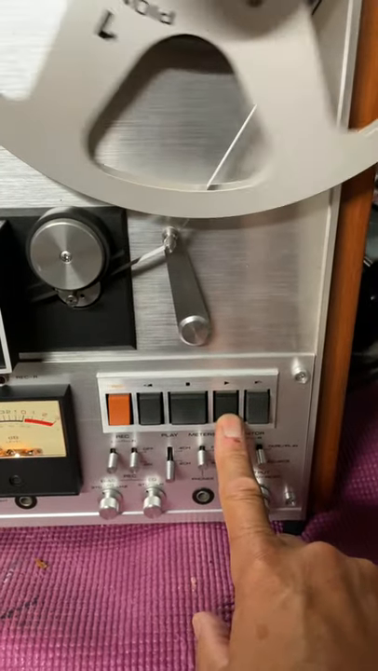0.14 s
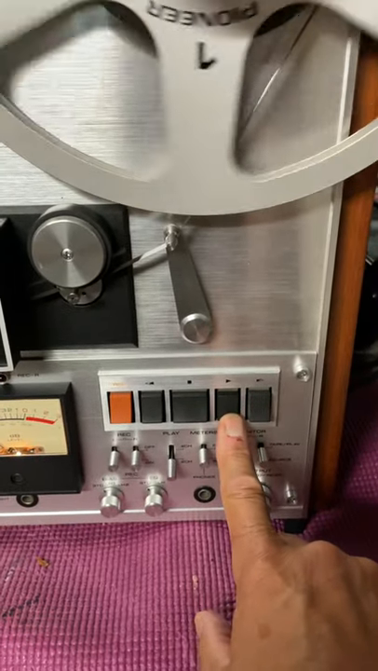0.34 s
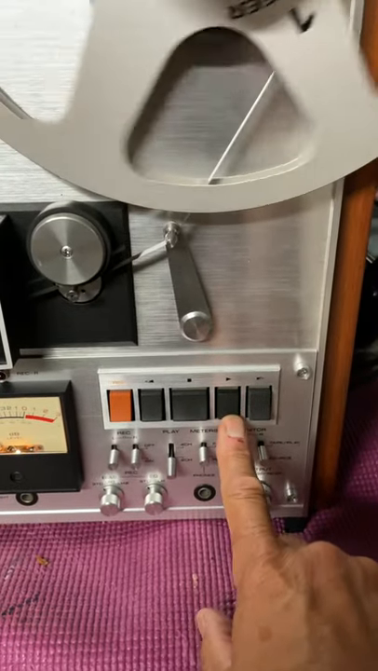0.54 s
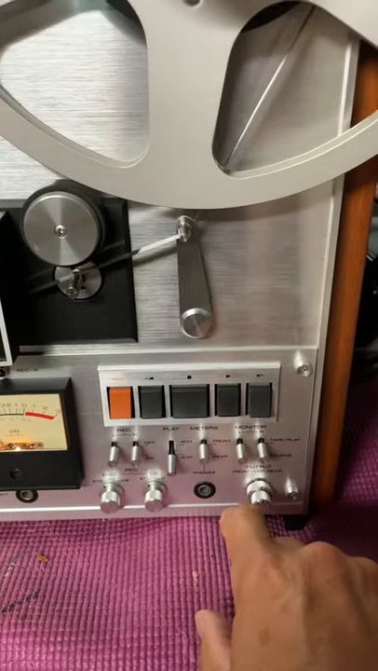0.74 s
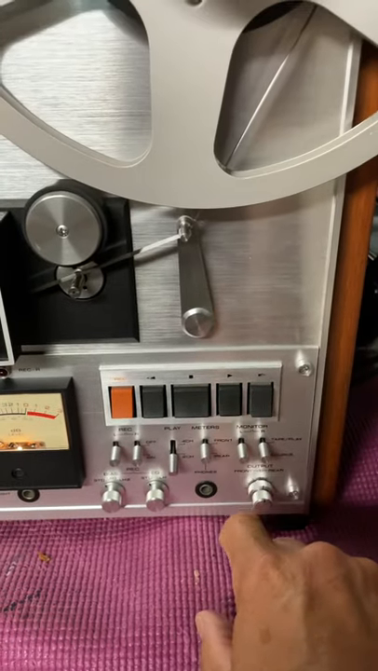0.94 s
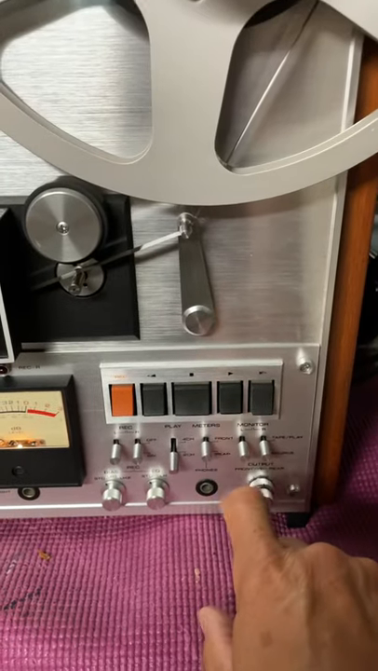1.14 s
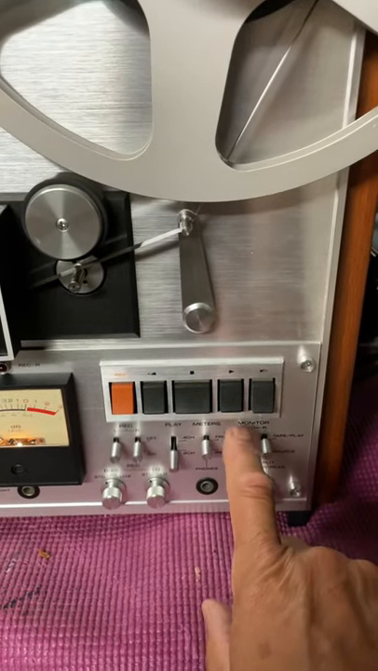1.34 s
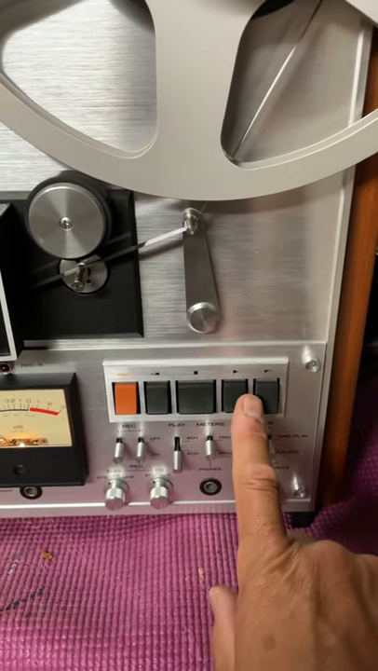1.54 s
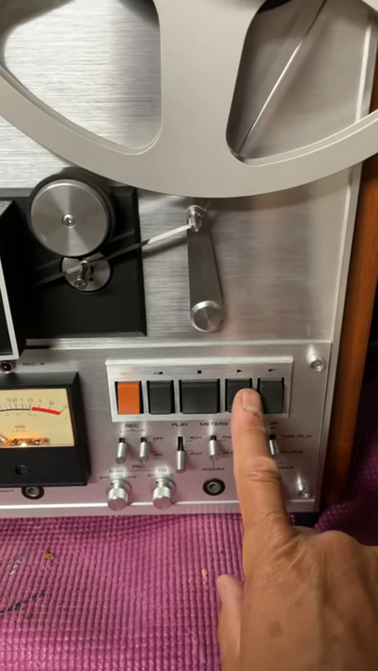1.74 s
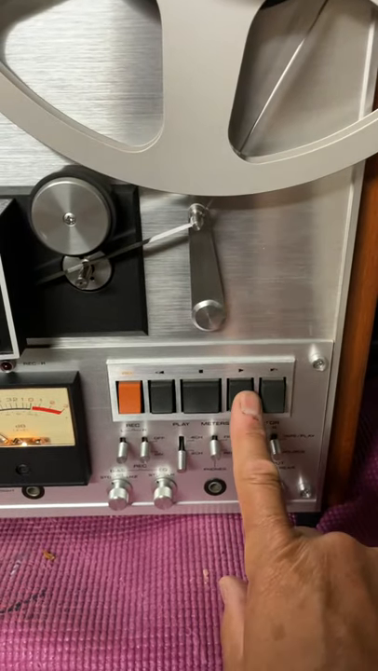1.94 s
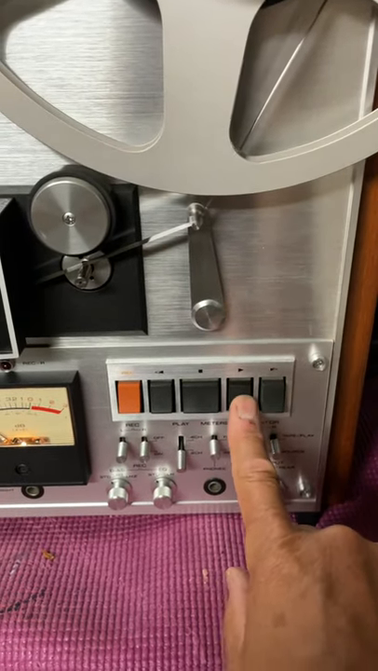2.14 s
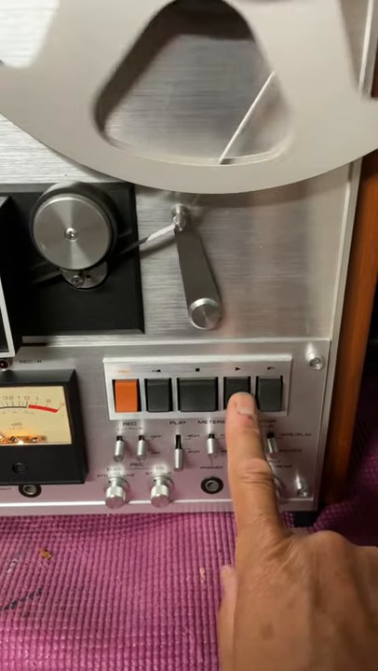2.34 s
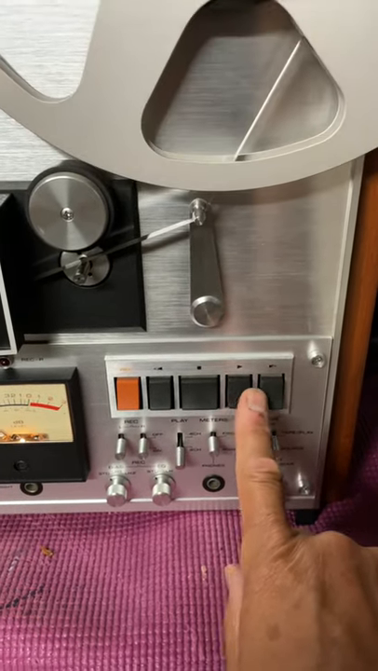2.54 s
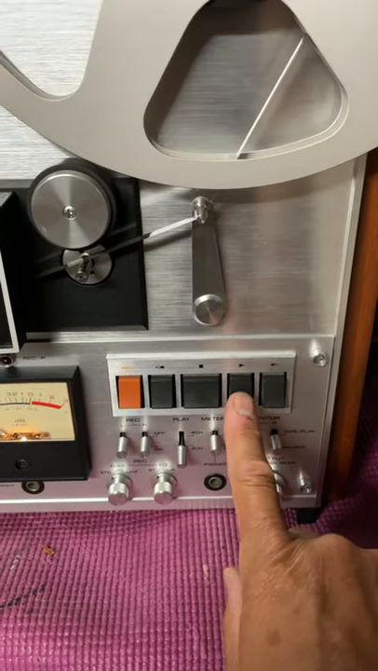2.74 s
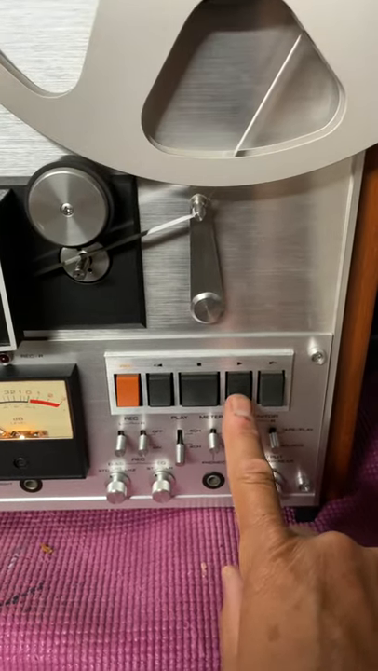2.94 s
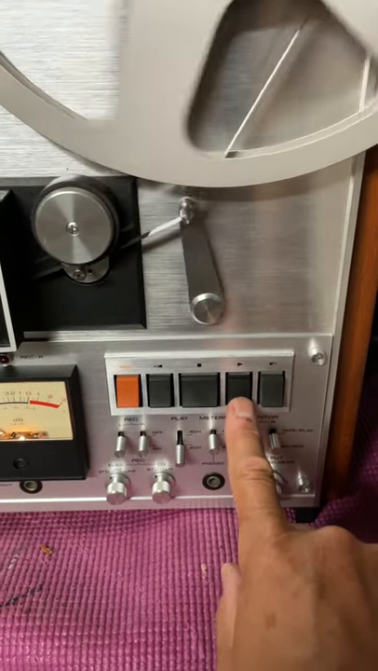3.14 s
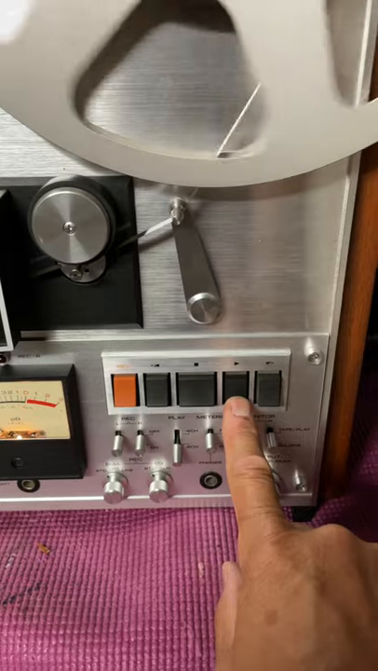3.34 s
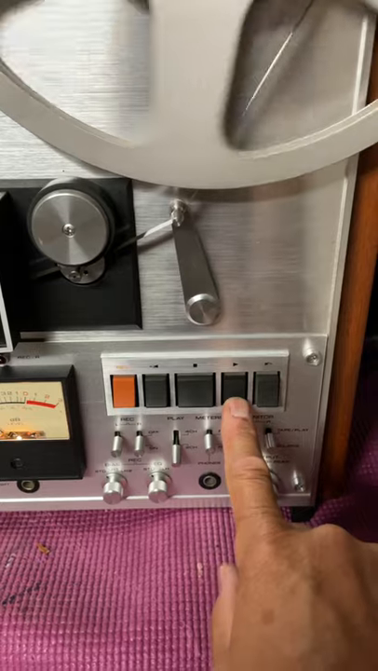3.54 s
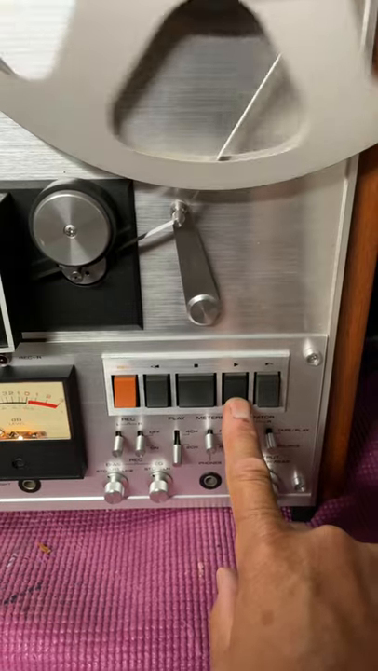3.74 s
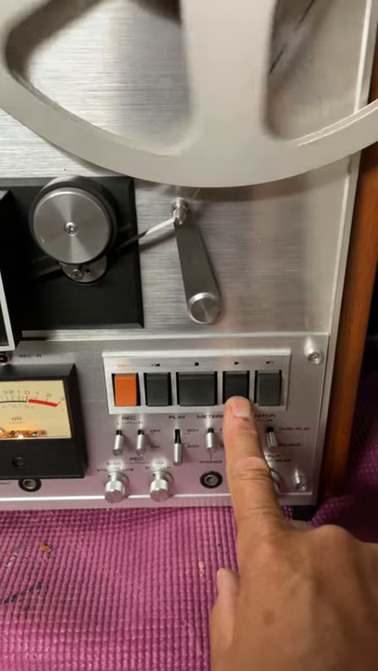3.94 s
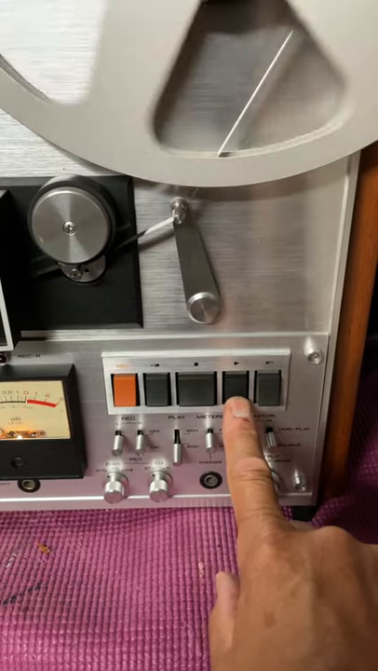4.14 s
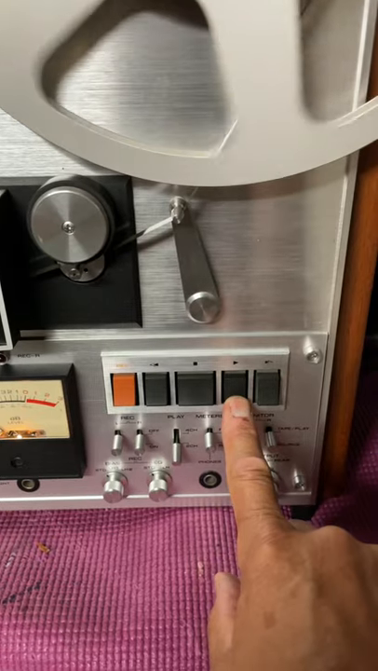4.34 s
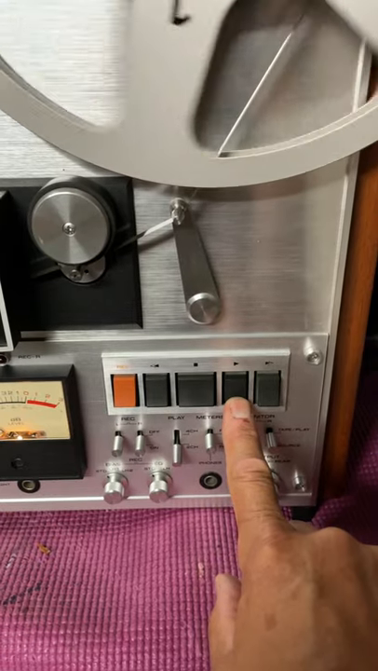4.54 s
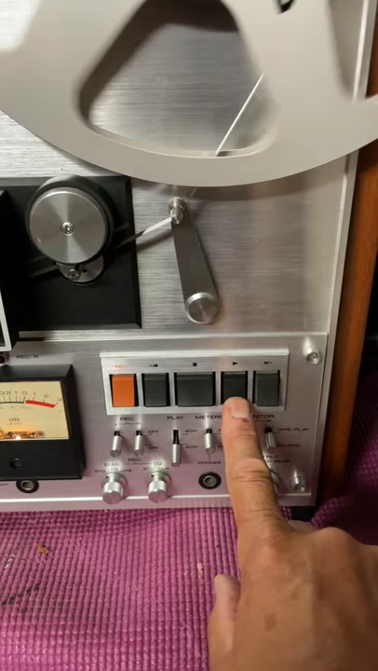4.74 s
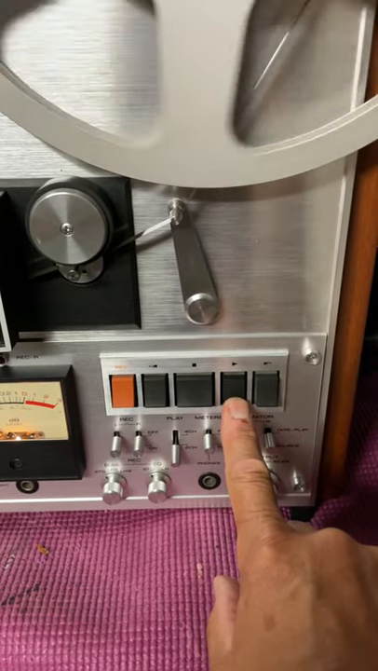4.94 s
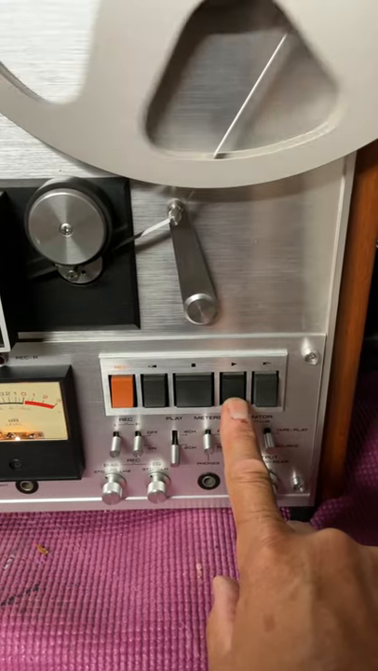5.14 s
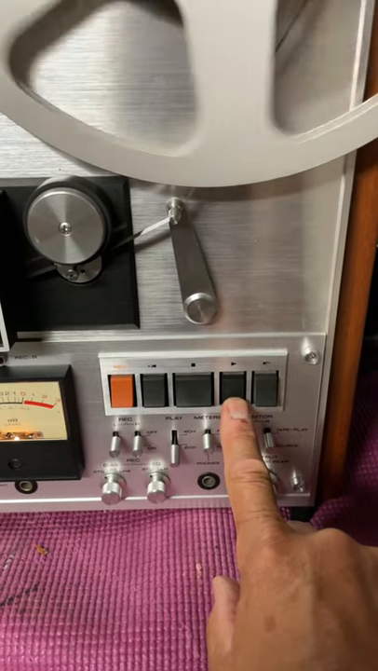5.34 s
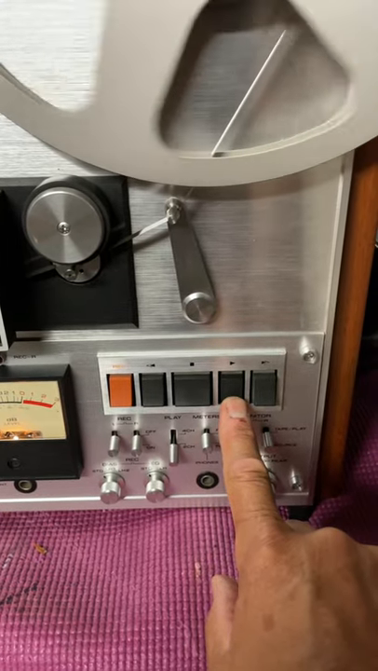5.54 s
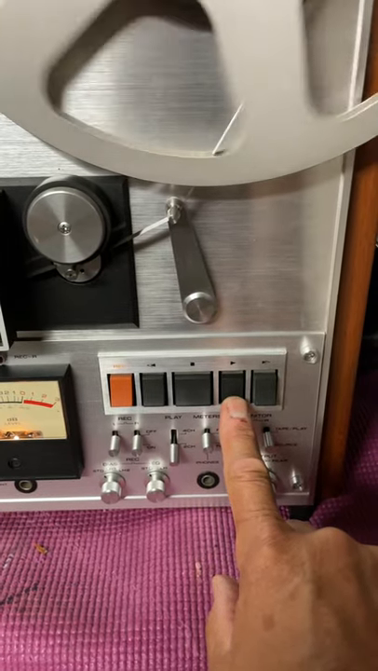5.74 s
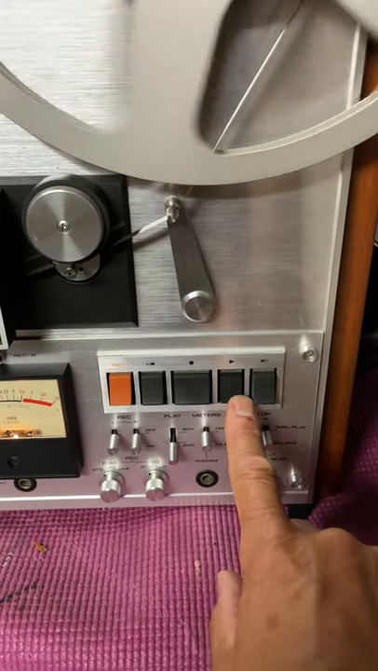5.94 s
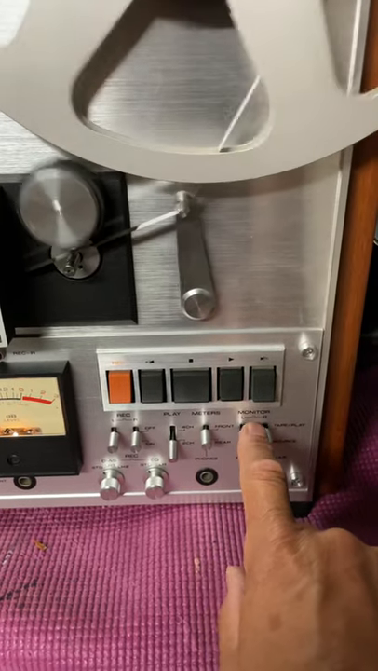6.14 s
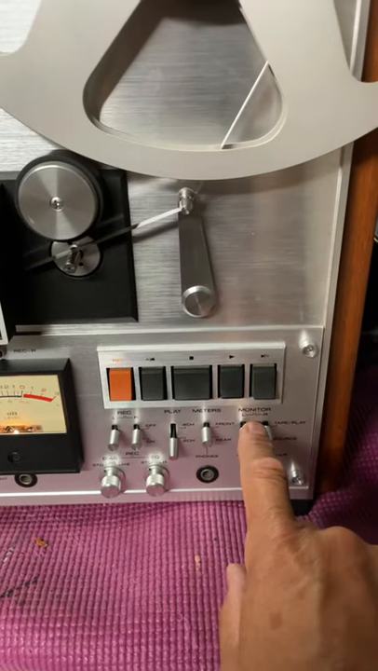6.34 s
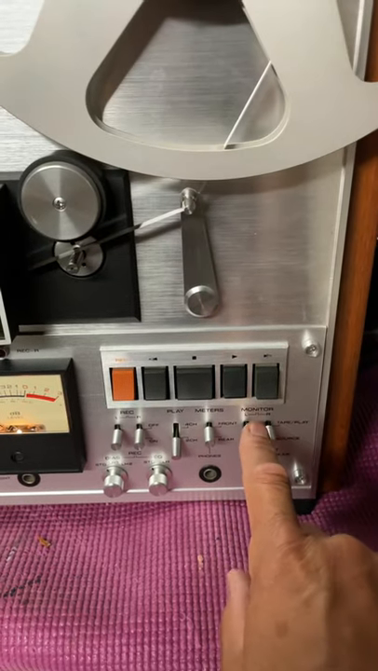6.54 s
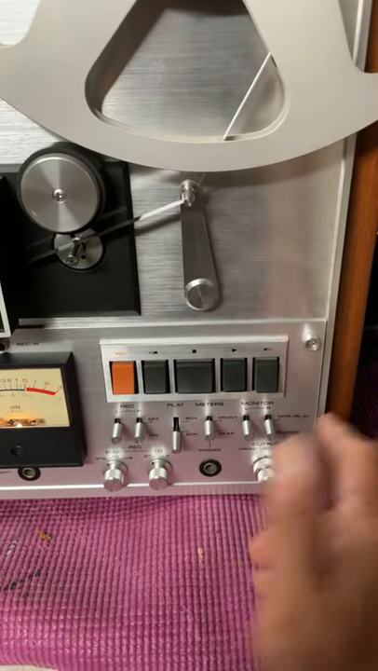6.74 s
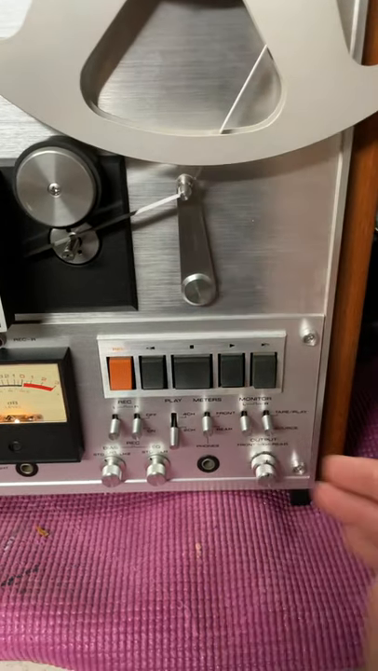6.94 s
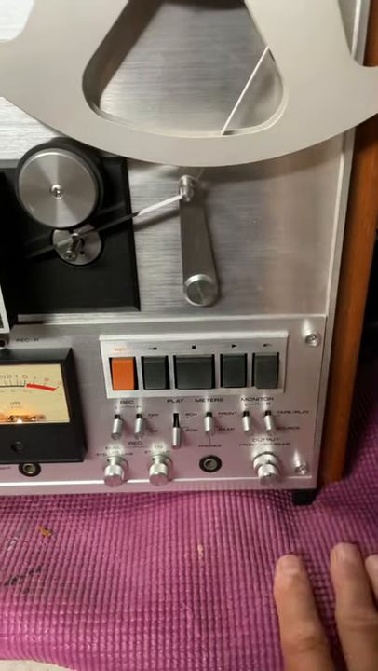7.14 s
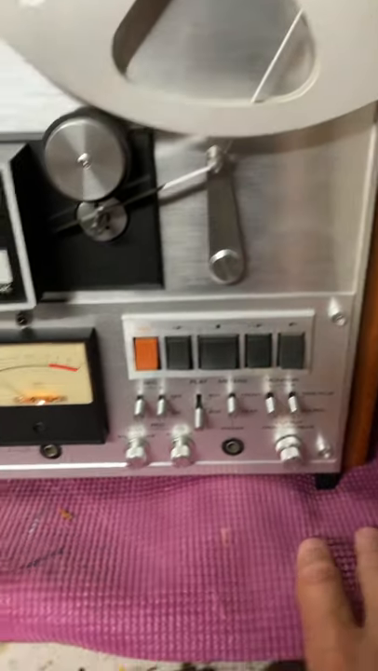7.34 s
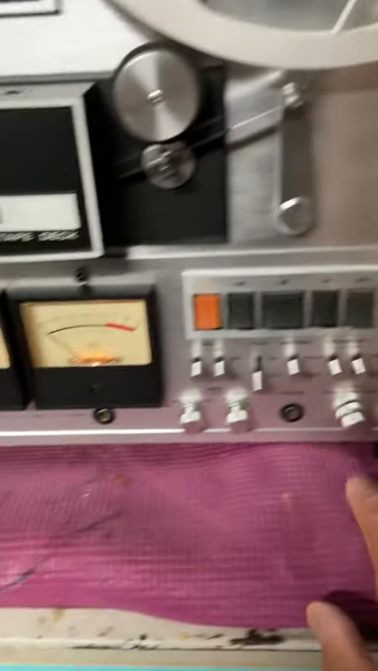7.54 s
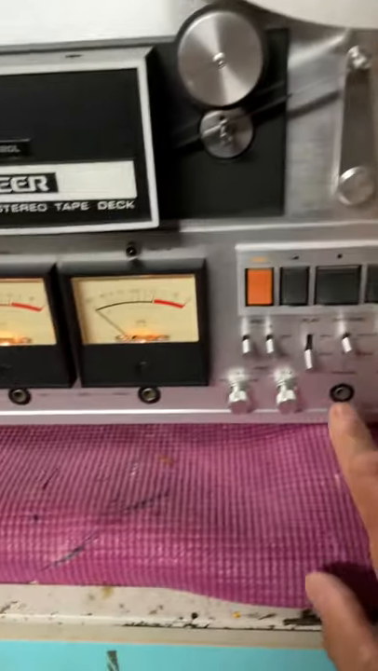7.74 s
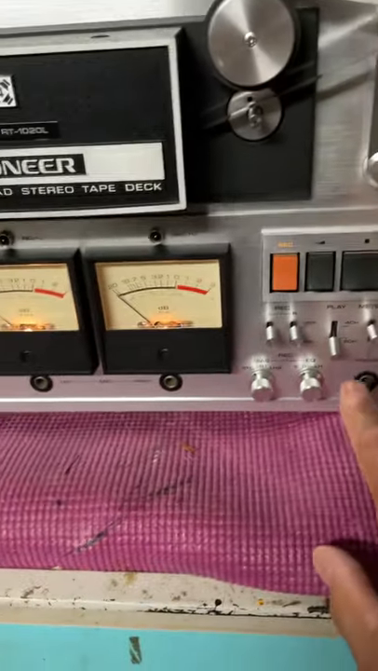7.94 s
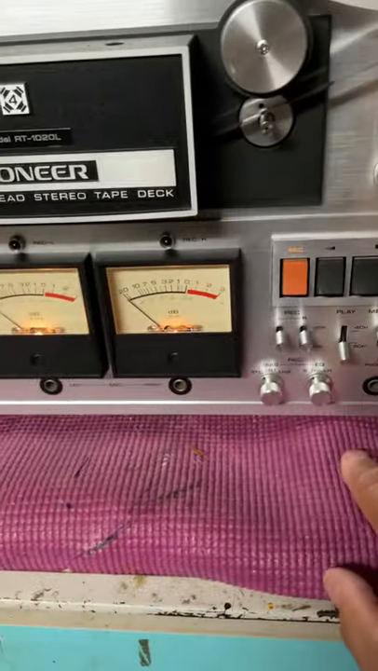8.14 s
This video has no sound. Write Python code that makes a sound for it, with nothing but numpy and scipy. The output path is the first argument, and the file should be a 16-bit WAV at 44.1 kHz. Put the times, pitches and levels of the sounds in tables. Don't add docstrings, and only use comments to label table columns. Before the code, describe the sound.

Low motor and mains hum with faint hiss runs throughout. Close up, heavy transport keys snap and rattle: a stop, a pause, a start chain, a slipping key, another start, then a long gap of running reels before the final stop. Light skin rubs, a quick knuckle knock and deep soft thumps close it. Dry small indoor space, phone microphone.

```python
import sys
import numpy as np
from scipy import signal
from scipy.fft import rfft, irfft
from scipy.io import wavfile
from scipy.ndimage import uniform_filter1d

SR = 44100
rng = np.random.default_rng(int(sys.argv[2]) if len(sys.argv) > 2 else 0)


def elevation(decibels):
    levels = np.asarray(decibels, float)
    return 10 ** (levels / 20)


def materialize(psi):
    bounded = np.clip(np.atleast_2d(psi).T, -1, 1)
    quanta = np.round(bounded * 32767).astype(np.int16)
    wavfile.write(sys.argv[1], SR, quanta)


N = 365148
HZ = np.maximum(np.fft.rfftfreq(N, 1 / SR), 1)

# t/s, strength/dB, stretch of the chain's delays
STARTS = [
    (2.0642, 1.5, 0.997),
    (2.9847, 0.5, 1.003),
]
STOPS = [
    (0.549, 0.5, 1.001),
    (6.0061, -0.5, 0.98),
]
# f/Hz, level/dB
PORT_DIFFERENCE = [(60, -45), (200, -29.5), (380, -13.5), (700, -5.5), (1300, -5), (1850, -19.5),
                   (2500, -2), (5000, -4.5), (6000, -13), (8500, -14.5), (9400, -34.5), (11000, -29),
                   (12500, -5.5), (14200, -42.5)]


def rms_one(x):
    return x / np.sqrt(np.mean(x ** 2) + 1e-20)


def at_hz(points, hz):
    point_hz, point_db = np.array(points).T[:2]
    return np.interp(np.log(hz), np.log(point_hz), point_db)


def ring(force, hz, t60):
    radius, angle = elevation(-60 / (t60 * SR)), 2 * np.pi * hz / SR
    return signal.lfilter([0, np.sin(angle)], [1, -2 * radius * np.cos(angle), radius ** 2], force + 1e-18)


def hum():
    # f/Hz, width/Hz, level/dB
    tones = [(46.5, 6.1, -51.5), (119.5, 3, -47), (176.3, 2.9, -53.5), (200, 11, -53), (258.6, 3, -55),
             (357.8, 8.8, -57), (480, 5.7, -82), (897, 11, -72), (1168, 8.7, -75), (4550, 15, -85),
             (5453, 40, -89.5)]
    out = np.zeros(N)
    for hz, width, db in tones:
        tone = ring(rng.standard_normal(N + SR), hz, 4.2 / width)
        out += elevation(db) * rms_one(tone[SR:])
    return out


def air():
    # f/Hz, density/dB per Hz
    room_noise = [(25, -41), (45, -4), (100, -4), (140, -9.5), (230, -10.5), (300, -16.5), (400, -24),
                  (800, -31), (2000, -42), (4500, -48.5), (7000, -56), (9500, -48), (13000, -54.5),
                  (16000, -81)]
    level_db, reels_hiss_db, still_hiss_db, spin_s = -42.5, 1.93, 0, 0.3
    shared, apart = rfft(rng.standard_normal((2, N))) * elevation(at_hz(room_noise, HZ))
    pair = shared + apart * elevation(at_hz(PORT_DIFFERENCE, HZ)) * [[1], [-1]]
    treble = 1 / (1 + (4000 / HZ) ** 4)
    now = np.arange(N) / SR
    turning = (now < STOPS[0][0]) | ((now > STARTS[-1][0]) & (now < STOPS[-1][0]))
    speed = uniform_filter1d(turning * 1.0, round(spin_s * SR))
    hiss = elevation(still_hiss_db + (reels_hiss_db - still_hiss_db) * speed) * irfft(pair * treble, N)
    rumble = irfft(pair * (1 - treble), N)
    return elevation(level_db) * (rumble + hiss) / np.std(irfft(shared, N))


def rubs():
    # t/s, peak/dB, low f/Hz, high f/Hz, length/s
    slides = [(0.29, -49.5, 480, 1500, 0.014), (1.003, -58, 1200, 2600, 0.05),
              (1.166, -56.5, 3500, 7500, 0.01), (1.185, -66, 3500, 6500, 0.028),
              (1.324, -56.5, 889, 1900, 0.035), (1.949, -58.5, 1500, 4000, 0.016),
              (5.562, -59.5, 2822, 4500, 0.012), (6.542, -58.5, 900, 4000, 0.022),
              (6.584, -61, 2500, 13000, 0.069), (6.663, -60.5, 4030, 14000, .035),
              (7.198, -61, 1490, 6500, 0.044), (7.407, -61, 1787, 5000, 0.031),
              (7.518, -64, 5000, 13000, 0.16), (7.648, -63.5, 5000, 7500, 0.13),
              (7.653, -66.5, 11500, 13700, 0.12), (7.756, -57.5, 1510, 4500, 0.031),
              (8.023, -61.5, 1495, 4500, 0.066), (7.5, -69, 3800, 4300, 0.68)]
    out = np.zeros(N + SR)
    grit = rng.standard_normal((len(slides), SR)) * elevation(2.5 * rng.standard_normal(SR))
    for (s, db, low_hz, high_hz, length), noise in zip(slides, grit):
        age = np.arange(SR) / SR / length
        swell = (1 - np.exp(-age * 8)) * np.exp(-age ** 2)
        band = signal.butter(2, [low_hz, high_hz], "band", fs=SR, output="sos")
        at = round(s * SR)
        out[at:at + SR] += elevation(db) * rms_one(signal.sosfilt(band, noise)) * swell
    return out[:N]


def chain(strokes, contacts):
    events = []
    for s, db, stretch in strokes:
        for delay, latch, panel, chassis, rattle in contacts:
            body_rattle = 0.0045 + 0.4 * rattle
            events.append((s + delay * stretch, latch + db, panel + db, chassis + db, rattle, body_rattle))
    return events


def struck(events, column, band_hz, modes, modes_db, grain_db, tail_db, tail_s):
    rise_s = 0.00022
    size = 4096
    age = np.arange(size) / SR
    out, kicks = np.zeros(N + size), np.zeros((len(modes), N))
    shape = (len(events), size)
    grains = rng.standard_normal(shape) * elevation(grain_db * rng.standard_normal(shape))
    strengths = elevation(0.96 * np.clip(rng.standard_normal((len(events), len(modes))), -2, 1.5))
    strengths *= rng.choice([-1, 1], strengths.shape)
    band = signal.butter(3, band_hz, "band", fs=SR, output="sos")
    for event, grain, strength in zip(events, grains, strengths):
        length = max(event[4 if column == 1 else 5], 0.0005)
        decay = np.exp(-age / length) + elevation(tail_db) * np.exp(-age / tail_s)
        fade = (1 - np.exp(-age / rise_s)) * decay
        rattle = signal.sosfilt(band, fade * grain)
        rattle *= np.sqrt(np.sum(fade ** 2) / np.sum(rattle ** 2))
        at = round(event[0] * SR)
        out[at:at + size] += elevation(event[column]) * rattle
        kicks[:, at] = elevation(event[column] + modes_db) * strength
    ringing = sum(elevation(db) * ring(kick, hz, t60) for kick, (hz, db, t60) in zip(kicks, modes))
    return out[:N] + ringing


def mechanism():
    # t/s, strength/dB, stretch
    slips = [
        (2.2868, 0.12, 1),
    ]
    settles = [
        (3.152, -3.5, 1),
        (3.381, 2, 1),
    ]
    # delay/s, latch/dB, panel/dB, chassis/dB, rattle/s
    start_chain = [(-.0077, -56, -50.5, -54, .0035), (0, -16, -52, -63, 0.00047),
                   (.0083, -32, -44, -45.5, .010), (.0205, -42, -42, -35, .012),
                   (.029, -38, -31, -32.5, 0.0055), (0.0347, -34, -40.5, -30.5, 0.0098),
                   (0.055, -42, -54, -37, 0.0097), (.0695, -16.5, -37.5, -60, .0017),
                   (.0752, -28.5, -25.5, -29.5, 0.0031), (.080, -26.5, -29, -29.5, 0.0028),
                   (0.1187, -46, -39, -30.5, 0.0012)]
    stop_chain = [(-.0082, -33.5, -34.5, -38.5, .0037), (0, -11, -17, -30, 0.0013),
                  (.002, -14, -16.5, -22, .0022), (.0058, -27.5, -30, -26.5, .0035),
                  (.018, -37.5, -27.5, -40, .008)]
    brake_chain = [(.053, -40.5, -48.5, -41.5, 0.0066), (0.0749, -33, -39, -35, .010),
                   (.082, -33.5, -39, -36, .012), (.1021, -20.5, -26, -37, .0018),
                   (0.1167, -38, -38, -32, .003)]
    slip_chain = [(-.0128, -48, -40, -45, .011), (0, -19.5, -43, -55, 0.0013),
                  (.0086, -34, -27, -38.5, 0.0085), (.015, -36.5, -40, -34, 0.012),
                  (.041, -46, -36, -34.5, 0.0089), (.060, -30, -47, -34.5, 0.013),
                  (.068, -31, -36, -31, .011), (.0889, -23, -31, -32.5, .0017),
                  (.093, -33.5, -38, -36, 0.00074), (.104, -58, -30.5, -32, 0.00057)]
    settle_chain = [(0, -57, -56, -74, .008)]
    # f/Hz, level/dB, t60/s
    latch = [(5000, -21, .012), (6000, -3, 0.0044), (7500, -7, 0.0038), (13540, -7.5, 0.0015)]
    catch = {"in": [(2600, -7.5, 0.017), (3814, -15.5, 0.031)], "out": [(4030, -2, 0.031), (5000, -7, .02),
             (5490, -4.5, 0.021)], "brake": [(5700, -5.5, .015), (7306, -7, .015)]}
    front_panel = {"in": [(1160, -13.5, 0.12), (1723, 1, 0.047), (2500, -20.5, 0.22), (2380, 1.5, 0.051),
                   (3180, 1, 0.02), (3700, -18, 0.016)], "out": [(1210, -8, 0.04), (1388, -7, 0.059),
                   (1545, -6.5, 0.07), (1846, -1.5, .04), (2430, -12, 0.065), (2990, -3.5, .03),
                   (3452, -10, 0.023)], "brake": [(1188.4, -3.5, .04), (1630, 0, .06), (2470, -22.5, .2),
                   (2515, -24.5, .15), (2810, -10, .05), (3500, -13, .02)]}
    chassis = {"in": [(206, 1, 0.11), (380.5, -4.5, 0.19), (305, -8, .06), (430, -14, 0.019),
               (627, 1.5, 0.076), (715, -12.5, 0.27), (805, -4, 0.052)], "out": [(297.8, -9.5, .05),
               (360, -0.5, 0.15), (540, -3.5, .04), (626, 1, .07), (705, -2.5, 0.09)],
               "brake": [(376, 1.28, .24), (434.2, -7.5, 0.027), (635, -7.5, 0.055), (900, -6, .05)]}
    motions = {"in": chain(STARTS, start_chain) + chain(settles, settle_chain),
               "out": chain(STOPS, stop_chain),
               "brake": chain(STOPS, brake_chain) + chain(slips, slip_chain)}
    out = np.zeros(N)
    for motion, events in motions.items():
        out += elevation(4.0) * struck(events, 1, [5400, 14000], latch + catch[motion],
                                 modes_db=-3.0, grain_db=10.0, tail_db=-24.0, tail_s=0.015)
        out += elevation(-0.6) * struck(events, 2, [1100, 3900], front_panel[motion],
                                  modes_db=1.0, grain_db=2.5, tail_db=-13.5, tail_s=0.023)
        out += elevation(-2.5) * struck(events, 3, [330, 950], chassis[motion],
                                  modes_db=1.5, grain_db=1.5, tail_db=-14, tail_s=0.045)
    return out


def hand():
    # t/s, bright/dB, middle/dB, low/dB, rattle/s
    landings = [
        (7.018, -46, -40.5, -49, 0.015),
        (7.023, -36.5, -32, -38, 0.0021),
        (7.031, -33.5, -27.5, -32.5, 0.0025),
        (7.041, -54, -47, -27, 0.0035),
    ]
    # t/s, peak/dB, f/Hz, t60/s
    thumps = [(6.158, -28.5, 51.2, 0.151), (6.55, -28.5, 61.2, 0.11), (6.669, -23.5, 67.9, 0.18),
              (7.211, -14.5, 65, 0.15), (7.251, -22.5, 62.17, 0.15), (7.309, -28.5, 58.8, 0.18),
              (7.773, -9, 67.45, 0.109)]
    # f/Hz, level/dB, t60/s
    table_modes = [(143, 0.5, 0.096), (223.5, 0.5, 0.087), (306, -5.5, 0.048), (644, -9, 0.055),
                   (1570, 1.5, 0.0052), (5950, -9, 0.0021)]
    knocks = [(*landing[:4], 0.0032, landing[4]) for landing in landings]
    out = struck(knocks, 1, [3200, 13500], table_modes[5:],
                 modes_db=5.0, grain_db=9.0, tail_db=-26, tail_s=0.027)
    out += struck(knocks, 2, [900, 3000], table_modes[3:5],
                  modes_db=7.5, grain_db=9.5, tail_db=-28, tail_s=0.0073)
    out += struck(knocks, 3, [130, 330], table_modes[:3],
                  modes_db=6.0, grain_db=0.0, tail_db=-45.5, tail_s=0.016)
    for s, db, hz, t60 in thumps:
        age = np.maximum(np.arange(N) / SR - s, 0)
        swell = (1 - np.exp(-age / 0.011)) ** 2 * elevation(-60 * age / t60)
        out += elevation(db + 7) * swell * np.sin(2 * np.pi * hz * age)
    return out


def room(near):
    t60_s, level_db = 0.13, -14.5
    size = SR // 2
    age = np.arange(size) / SR
    tail = rng.standard_normal((2, size)) * elevation(-60 * age / t60_s) * (age > 0.001)
    tail *= 1.3 / np.sqrt(np.sum(tail[0] ** 2))
    shared, apart = signal.lfilter([1], [1, -0.6], tail)
    apart = irfft(rfft(apart, N) * elevation(-0.5 + at_hz(PORT_DIFFERENCE, HZ)), N)[:size]
    upper = signal.sosfilt(signal.butter(2, 300, "high", fs=SR, output="sos"), near)
    return elevation(level_db) * signal.fftconvolve(upper[None], shared + apart * [[1], [-1]])[:, :N]


def scene():
    near = mechanism() + hand() + rubs()
    shadow = elevation(-24.5) * signal.sosfilt(signal.butter(2, 8500, "high", fs=SR, output="sos"), near)
    return near + shadow * [[1], [-1]] + room(near) + hum() + air()


def top_cut(x):
    return signal.sosfilt(signal.butter(12, 16820, fs=SR, output="sos"), x)


def record(dry):
    # f/Hz, phase/turns
    port_lead = [(0, 0), (2000, .015), (4200, .13), (4800, .14), (5500, .05), (6200, .1), (7600, .29),
                 (8800, .41), (9400, .485), (11000, .515), (11600, .59), (12400, .7), (14200, 1),
                 (22050, 1)]
    # f/Hz, level/dB
    response = [(20, -3.5), (40, 0), (4000, -2.5), (4800, -4), (5500, -0.5), (14500, -1), (15800, -4),
                (16000, -42.5)]
    lead = np.interp(HZ, *np.transpose(port_lead))
    turn = np.exp(1j * np.pi * lead * np.array([[1], [-1]]))
    colour = elevation(np.interp(HZ, *np.transpose(response)))
    heard = irfft(rfft(dry) * turn * colour, N)
    rounded = heard / (1 + np.abs(heard / 0.84) ** 6) ** (1 / 6)
    return top_cut(rounded)


dry = scene()
out = record(dry)
materialize(out)
```